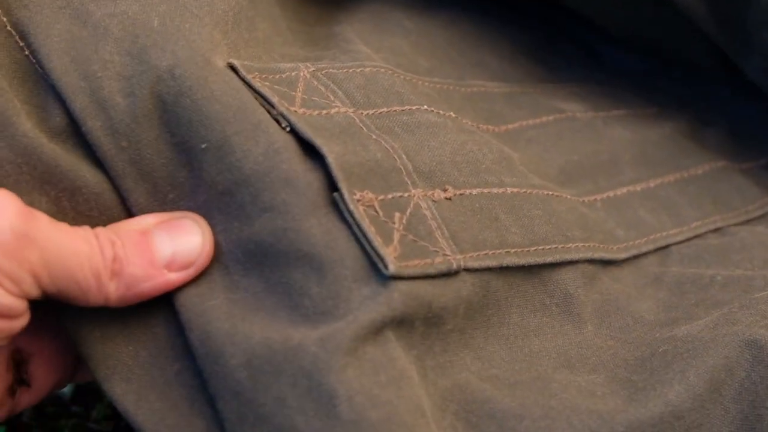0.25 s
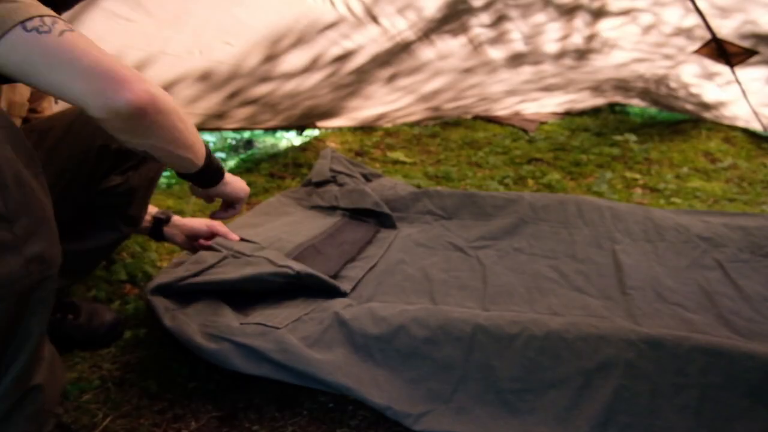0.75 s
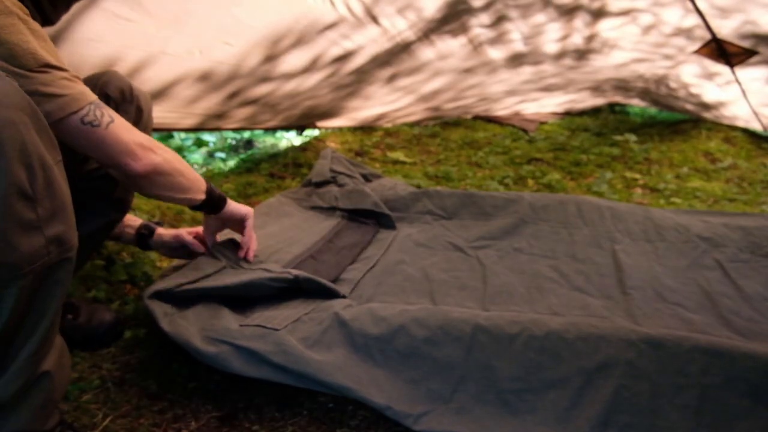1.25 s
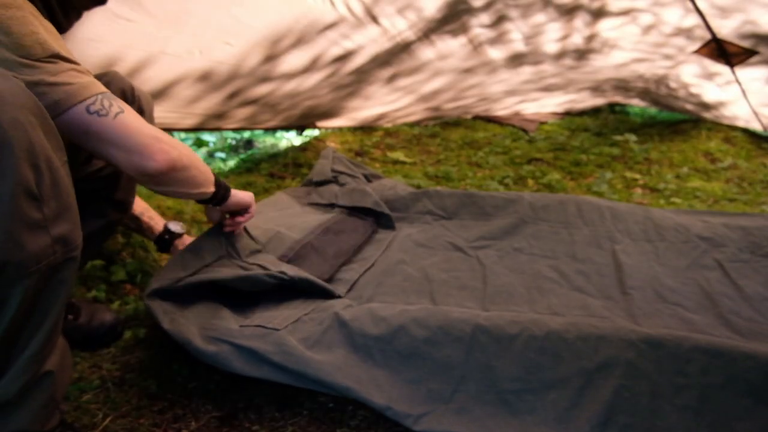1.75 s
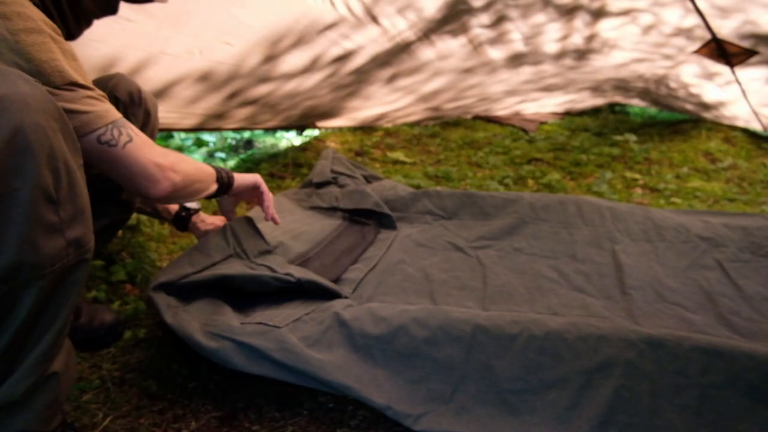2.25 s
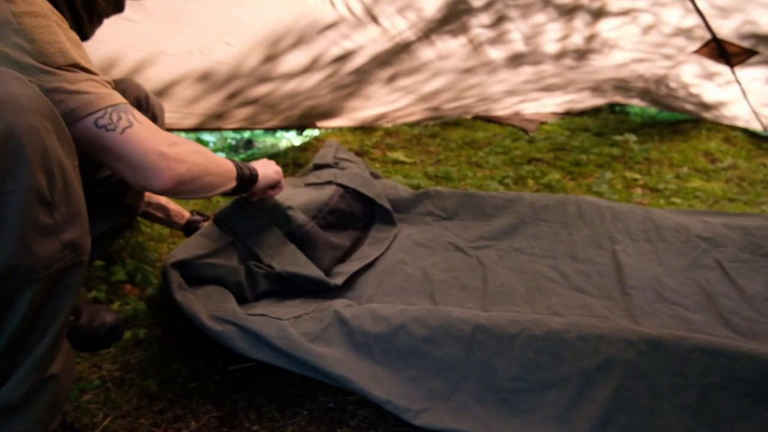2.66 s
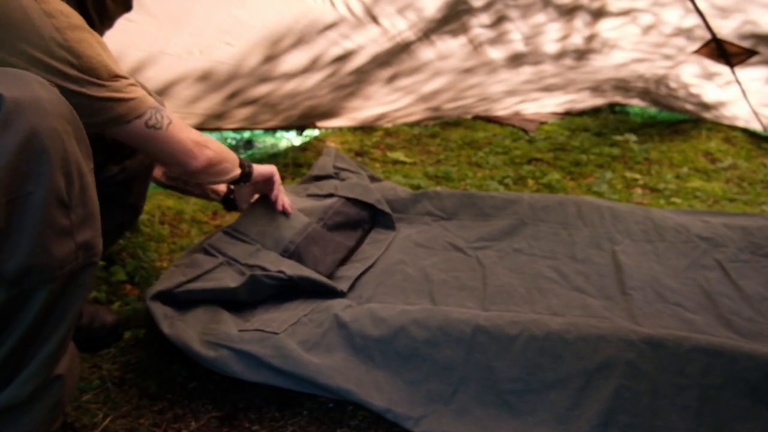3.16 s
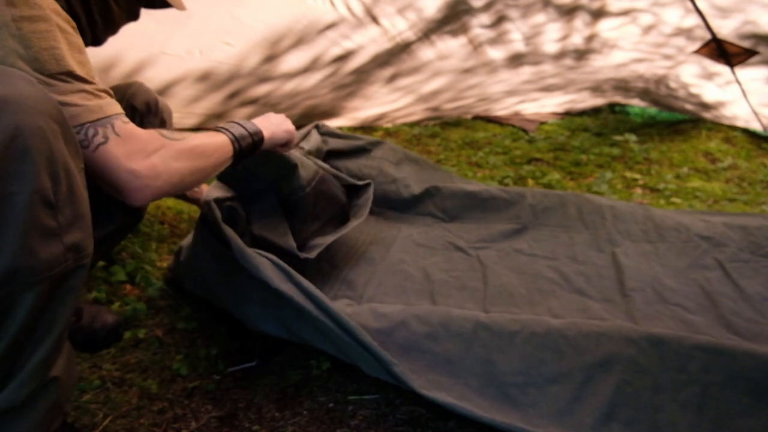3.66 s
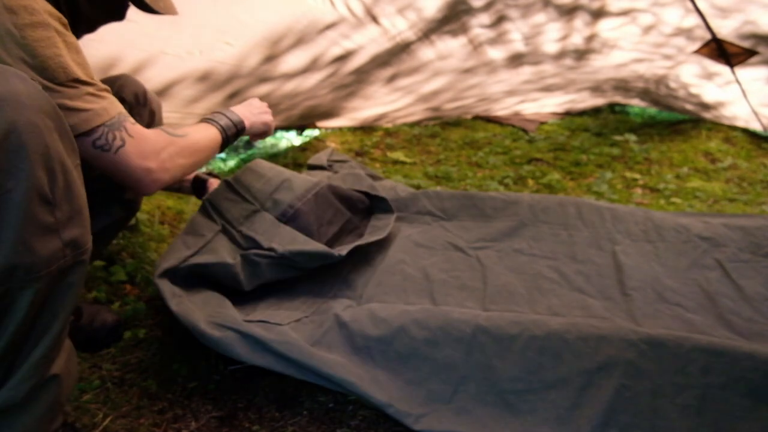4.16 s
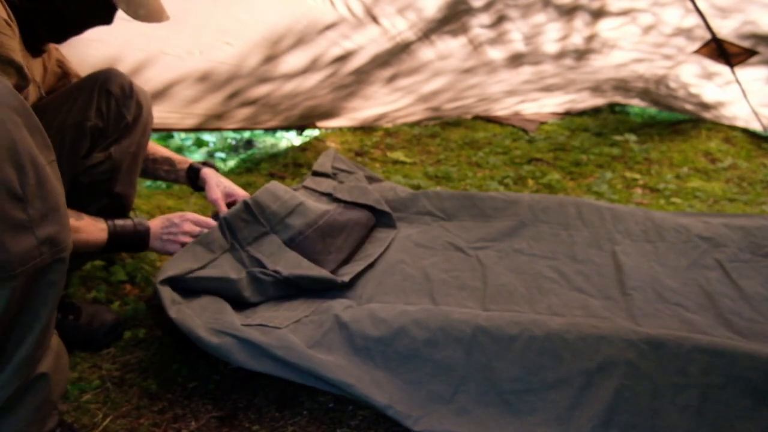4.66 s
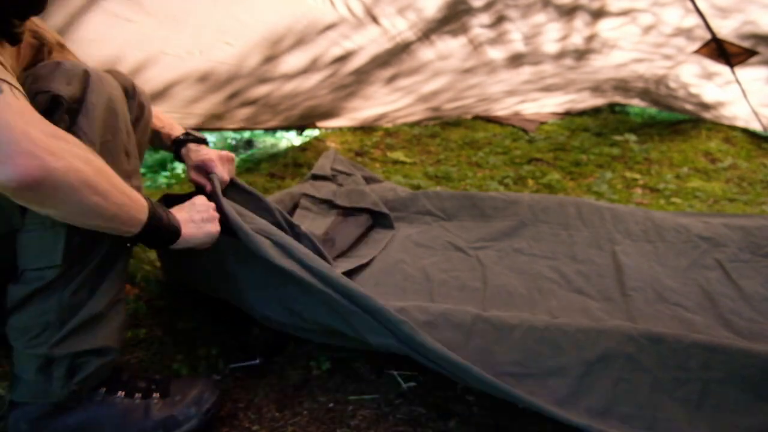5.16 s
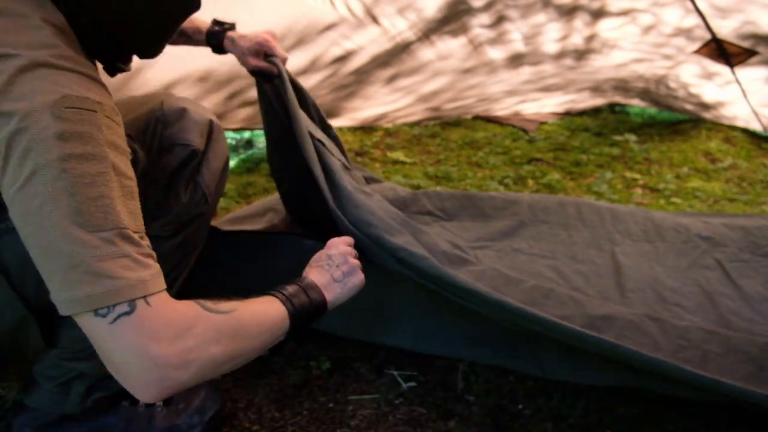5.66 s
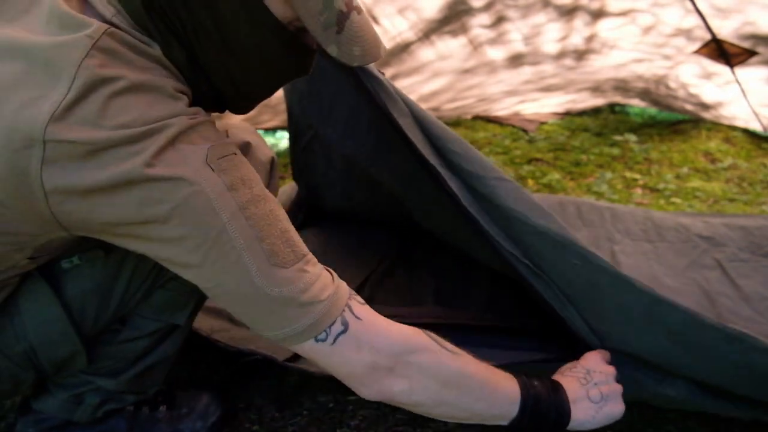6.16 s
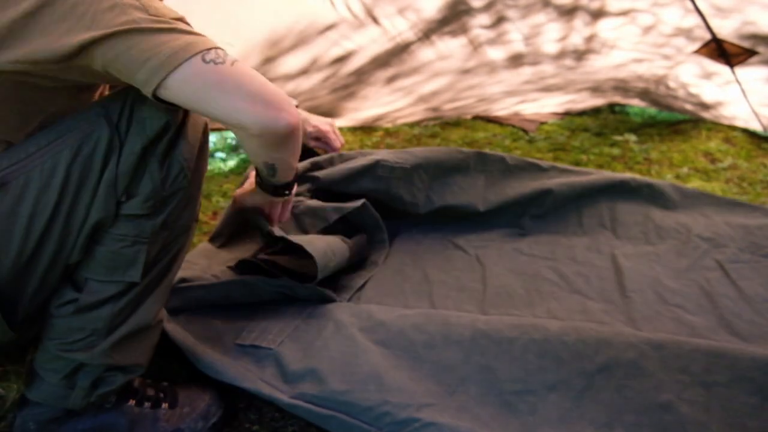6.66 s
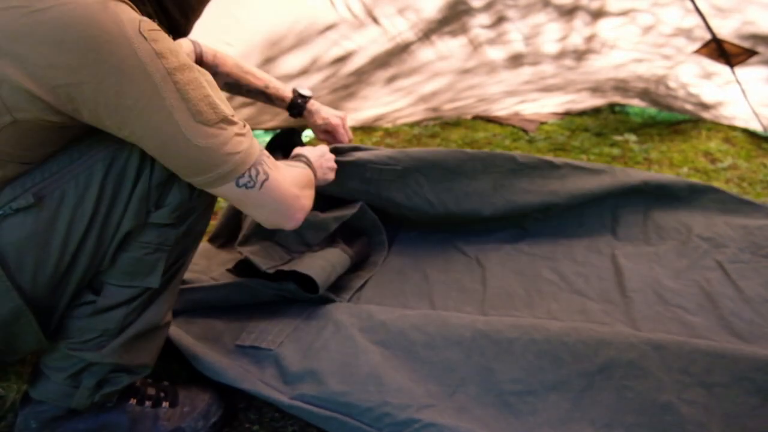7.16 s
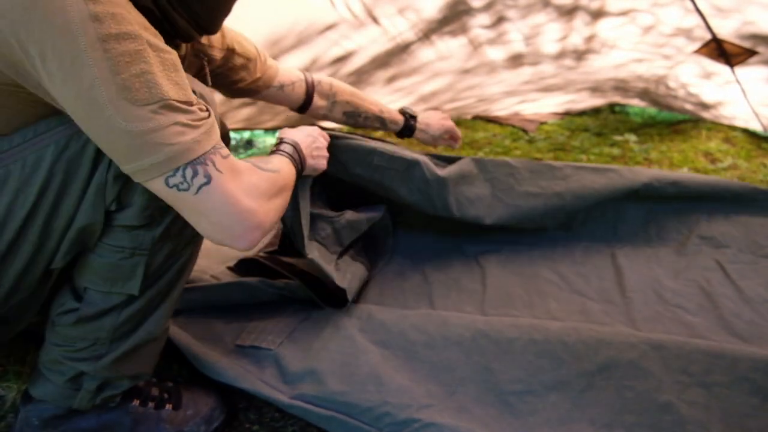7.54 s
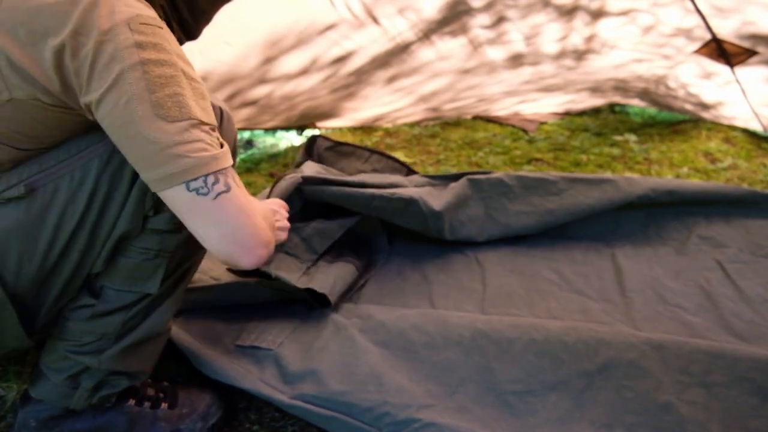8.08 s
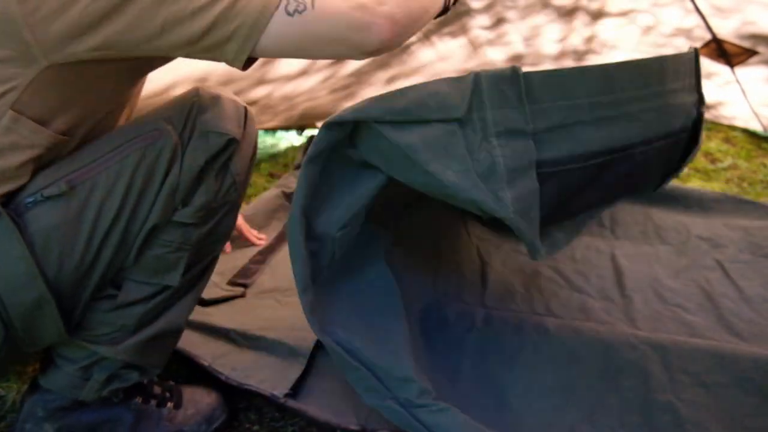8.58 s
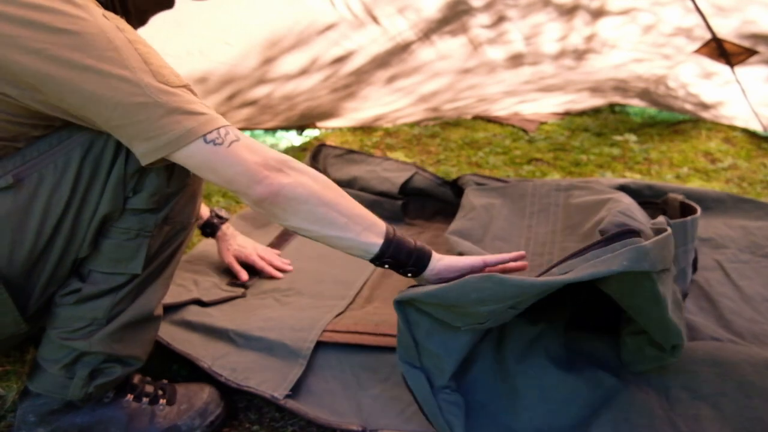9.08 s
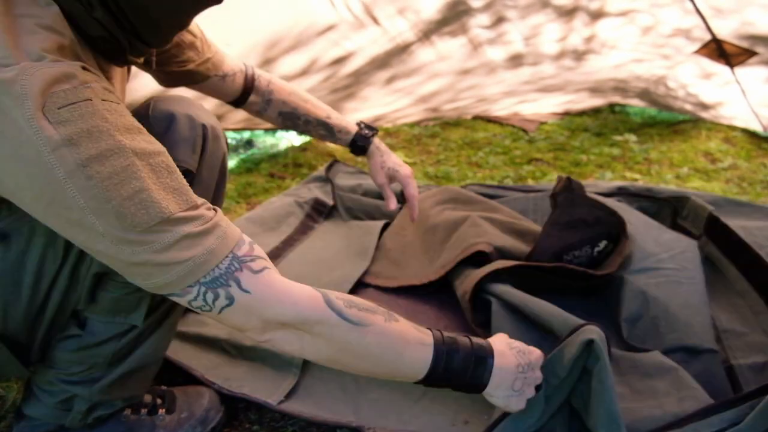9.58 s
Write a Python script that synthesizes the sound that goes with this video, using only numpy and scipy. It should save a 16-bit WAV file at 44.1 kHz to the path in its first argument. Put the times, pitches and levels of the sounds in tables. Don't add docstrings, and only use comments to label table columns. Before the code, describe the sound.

Close stereo pickup outdoors, with a low, soft hush of distant leaves and air and faint cloth rustle throughout. At 0.65-0.85 s a light cluster of dry pops as hook-and-loop tape begins to give. From 1.55 to 2.0 s a long bright crackling rip; 2.5-2.75 s a hard short one, with weak remnants to 2.95; 3.34-3.65 s a last rip, starting with sharp snaps. From 3.65 to 4.75 s a small metal zip pull clinks and jingles while canvas is gripped and rustles until 5.1. Zip strokes follow: quick rising-falling zings at 5.2 and 5.7, a slower, lumpier one at 6.3-6.6, a steady one at 7.2-7.5, with pull rattling and cloth shifting between. At 8.3-8.5 s the heavy flap is thrown open, loud, scratchy and airy, with a soft thump; pats at 8.75, then small rustles at 9.05 and 9.65 as it settles by 9.8.

```python
import sys
import numpy as np
from scipy import signal
from scipy.fft import rfft, irfft, next_fast_len
from scipy.io import wavfile
from scipy.ndimage import uniform_filter1d, map_coordinates

SR = 44100
rng = np.random.default_rng(int(sys.argv[2]) if len(sys.argv) > 2 else 0)


def volts(x):
    e = np.asarray(x, float) / 20
    return 10 ** e


def materialize(psi):
    bounded = np.clip(np.atleast_2d(psi).T, -1, 1)
    quanta = np.round(bounded * 32767).astype(np.int16)
    wavfile.write(sys.argv[1], SR, quanta)


N = 432621

# (frequency [Hz], level [dB])
HUSH_SPECTRUM = [(12, -46), (20, -20), (70, -3.5), (164, 0), (210, -3.5), (270, 2.5), (341, -3),
                 (415, -2.5), (614, 0), (1170, 1), (2050, -6), (4640, -9.5), (7900, -19.5), (12000, -36),
                 (15100, -50), (16400, -47)]
# (frequency [Hz], correlation [-1 to 1])
HUSH_ALIKE = [(60, .4), (250, .15), (1400, .55), (3000, .55), (5000, .6), (10000, .1), (12500, -.5)]
HUSH_DB = -36.5

# (frequency [Hz], lead [rad])
PORT_LEAD = [(0, -0.5), (3700, -0.26), (6500, 1.14), (9200, 1.51), (11700, 2.5), (14000, 4), (16200, 5)]
# (time [s], left minus right [dB])
HANDS_SIDE = [(0, 0.5), (8.2, -1.5), (8.7, -4.5), (9.81, -1.5)]
# (frequency [Hz], t60 [s])
TARP_DECAY = [(200, 0.05), (2000, 0.073), (10000, 0.036)]
# (frequency [Hz], level [dB])
TARP_COLOUR = [(100, -6.5), (1000, -4.5), (4000, 0.5), (9000, 4.5), (13000, 0), (16000, -19)]
# (frequency [Hz], level [dB])
BAND_EDGE = [(15700, 0), (15900, -38), (16300, -40), (16500, -100)]
# (time [s], length [s], lower edge [Hz], upper edge [Hz])
LOST_BANDS = [(.653, .014, 11700, 13900), (1.56, .012, 11000, 14000), (2.926, .012, 11200, 16500),
              (3.695, .035, 14900, 16500), (3.773, .05, 13200, 15000), (3.915, .018, 12000, 16500),
              (3.95, .035, 12950, 16500), (4.235, .012, 11200, 14000), (4.307, .048, 15000, 16500),
              (5.4, .028, 12250, 13400), (5.817, .07, 12500, 14000), (5.82, .045, 15000, 16500),
              (6.618, .024, 12000, 16500), (7.375, .025, 14800, 16500), (8.58, .024, 13600, 16500)]

# (time [s], rustle level [dB])
FIDGET = [(0, -49), (0.6, -46.5), (1.2, -46), (1.6, -46.5), (2.2, -52), (3.2, -45), (4.05, -48), (4.7, -46),
          (6.1, -47.5), (6.9, -45), (7.9, -44), (8.6, -43), (9.4, -45), (9.81, -48.5)]
# (time [s], swell length [s], rustle level [dB], flap level [dB])
STIRS = [(2.13, 0.06, -41.5, -56), (2.47, 0.37, -45.5, -60), (3.0, 0.082, -53, -48),
         (3.06, 0.058, -40.5, -52), (3.32, 0.033, -41, -56), (3.77, 0.11, -46, -44), (3.9, .015, -50, -45),
         (4.2, 0.035, -41, -36.5), (4.262, .025, -37, -35.5), (4.38, 0.047, -36.5, -42),
         (4.85, 0.01, -50, -33.5), (4.945, 0.033, -35.5, -47), (5.05, 0.09, -38.5, -45),
         (5.18, 0.086, -41, -38), (5.4, 0.049, -43, -40.5), (5.67, 0.11, -54, -44.5),
         (5.98, 0.059, -48, -42), (6.65, 0.11, -45.5, -41), (7.11, 0.052, -38.5, -38.5),
         (7.15, 0.038, -47, -44), (7.53, 0.093, -43, -42), (7.66, 0.092, -51, -39.5),
         (8.06, 0.023, -35, -54), (8.1, 0.05, -35, -54), (8.19, 0.027, -36, -37), (8.87, .06, -51, -54),
         (9.03, 0.057, -40, -38), (9.08, 0.023, -34.5, -31), (9.24, .1, -46, -60),
         (9.64, 0.028, -37.5, -35)]
# (time [s], swell length [s], rustle level [dB], flap level [dB])
FLINGS = [(8.29, 0.049, -39, -32.5), (8.323, 0.049, -27.5, -21), (8.365, 0.055, -27, -19),
          (8.41, 0.044, -31, -36), (8.452, 0.06, -25, -27.5), (8.478, 0.041, -21.5, -24.5),
          (8.535, 0.017, -30.5, -48), (8.72, 0.039, -37, -21), (8.745, 0.04, -29.5, -22),
          (8.775, 0.031, -30.5, -29.5), (8.8, 0.017, -41, -29)]
# (time [s], swell length [s], level [dB])
THUMPS = [
    (2.78, 0.13, -54),
    (3.584, 0.12, -41),
    (4.26, 0.033, -44),
    (5.36, 0.036, -46),
    (5.8, 0.031, -48),
    (5.94, 0.025, -44),
    (8.348, 0.14, -36.5),
    (8.744, 0.069, -40),
]
# (frequency [Hz], level [dB per Hz])
WEAVE_SPECTRUM = [(530, -28), (900, -7), (1760, -7), (2920, -4), (3640, -1.5), (8110, -5.5), (15200, -17),
                  (16400, -40)]
# (frequency [Hz], level [dB])
FLAP_SPECTRUM = [(100, -35), (170, -7.5), (297, -8), (439, -1.5), (559, -7.5), (757, -5), (870, -7.5),
                 (1560, -9.5), (3500, -26), (4550, -75), (7700, -120)]
# (frequency [Hz], level [dB])
GROUND_SPECTRUM = [(15, -50), (25, -22), (75, 0.5), (156, 0), (220, -4), (290, -5), (480, -120)]
STIR_RISE, FLING_RISE, THUMP_RISE = 1, 0.11, 0.34
SWELL_ROUND = 2.1
FIDGET_FLAP_DB = 1.5
WIDE_DB = -3

# (time [s], peak level [dB], low ring [dB], high ring [dB], tick above peak [dB])
JINGLES = [(2.2851, -29.5, -4, -12, 8.5), (3.6514, -19, -10, -8, -5), (3.7406, -17, -8, -3, -4),
           (3.7644, -26, -5, -12, -1), (3.7877, -24, -1, -6, 0), (3.8114, -27, -5, -10, 0),
           (3.9054, -18, -6, -18, -1), (3.935, -10, -9, -13, -11), (3.9468, -23, -11, -14, 5),
           (3.9844, -33, -3, -12, 2), (4.1539, -30, -1, -14, 2), (4.1858, -24, -6, -11, -3),
           (4.2188, -31, 8, -8, -3), (4.255, -19, -1, -12, 2), (4.283, -20, -12, -10, 11.5),
           (4.3155, -27.5, -1, -2, 5), (4.3624, -35, -3, -12, 2), (4.6672, -27, 0, -14, 7),
           (4.744, -34, -3, -12, 2), (6.5982, -28, 5, -14, 2), (6.6274, -19.5, 3, -20, 7),
           (6.7342, -21, 5.5, -15, 0), (7.0951, -29.5, 11, -13, 0), (7.5593, -29.5, 11, -17, 6),
           (7.632, -25.5, -3, -16, 13), (7.6816, -21, -4, -19, 4), (7.743, -26.5, -2, -14, 5),
           (8.514, -24, 9, -22, 2), (8.5873, -31, 3, -12, -2), (8.671, -21.5, -4, -16, 9)]
# (frequency [Hz], level [dB], t60 [s])
PULL_MODES = [(4000, -1, 0.075), (5750, 2, 0.036), (6230, -5, 0.045), (7800, -6, .04), (8890, -0.5, 0.075),
              (9060, -1, 0.058), (10600, -6.5, 0.045), (12500, 6, 0.07), (14600, 2, 0.077)]
# (time [s], peak level [dB])
RATTLES = [
    [(5.2293, -37), (5.2542, -18), (5.2891, -26), (5.3211, -25), (5.3694, -27)],
    [(5.7233, -42), (5.7892, -21), (5.8121, -25), (5.845, -17), (5.9069, -32), (5.9343, -26)],
    [(6.2873, -34), (6.3242, -26), (6.396, -38), (6.4569, -19.5), (6.5218, -31), (6.5741, -43)],
    [(7.1878, -30), (7.2307, -23), (7.2701, -20), (7.314, -14.5), (7.4068, -19), (7.4996, -40)],
]
# (added level [dB], low ring [dB], tick above peak [dB])
RATTLE_RING = (8.3, -12, 0)
RATTLE_HIGH_DB = [-5, -13, -16, -11]

# (time [s], tooth rate [1/s], tone level [dB], octave level [dB], scraping level [dB])
STROKES = [
    [(5.19, 253, -32, -46, -46), (5.208, 260, -26, -46, -44), (5.226, 485, -11, -36, -28),
     (5.236, 730, -37, -49, -18), (5.246, 910, -27, -17, -27), (5.292, 1160, -22, -39, -21.5),
     (5.308, 1090, -46, -34, -23.5), (5.33, 780, -26, -48, -24), (5.365, 650, -36, -43, -30.5)],
    [(5.69, 220, -54, -58, -39.5), (5.735, 374, -25, -29, -32), (5.782, 680, -23, -23, -26.5),
     (5.808, 1070, -17, -31, -21), (5.842, 1150, -18, -34, -25.5), (5.86, 900, -46, -44, -23.5),
     (5.896, 940, -27, -49, -27), (5.918, 770, -25, -26, -23), (5.965, 381.7, -33, -51, -53)],
    [(6.28, 246, -46, -45, -48), (6.325, 300, -34, -25, -30), (6.365, 430, -34, -23, -35.5),
     (6.395, 540, -27, -13, -29), (6.418, 620, -28, -33, -31.5), (6.468, 445, -29, -24, -26),
     (6.52, 530, -38, -31, -27), (6.56, 285, -34, -24, -30.5), (6.61, 240, -53, -41, -47)],
    [(7.175, 213, -38, -34, -32), (7.255, 530, -30, -37, -27), (7.285, 795, -27, -24, -24),
     (7.312, 650, -26, -21, -25.5), (7.352, 710, -29, -23, -25.5), (7.398, 543, -25, -35, -27.5),
     (7.432, 610, -27, -26, -31), (7.465, 400, -27, -42, -46), (7.51, 213, -29, -53, -49)],
]
# (frequency [Hz], level [dB])
SLIDER_SPECTRUM = [(1060, -23.5), (1800, 8), (2490, 6.5), (3990, 2.5), (5070, 2), (9080, -0.5),
                   (13100, -13), (14800, -20), (16000, -28), (16400, -50)]
# (frequency [Hz], level [dB])
TAPE_SPECTRUM = [(59, -46), (100, -11), (579, -9), (1160, -1), (1460, -8), (1960, -5), (3500, -14.5),
                 (4550, -30), (7700, -120)]
# (frequency [Hz], level [dB per Hz])
SIZZLE_SPECTRUM = [(8000, -42), (11000, -4), (13000, 3), (15500, -1), (16400, -40)]
# (frequency [Hz], width [Hz], level [dB])
SHAKEN_MODES = [(4030, 74, -1), (8500, 74, -10), (14500, 200, 8)]
SLOW_TEETH, SLOW_LUMPS_DB = 950, 4
SIZZLE_DB, SIZZLE_DB_PER_OCTAVE = -12, 18
BUZZ_DB_PER_OCTAVE = 5

# (time [s], peak level [dB], centre [Hz], cloth knock above peak [dB])
POPS = [(0.667, -24, 8400, -3), (0.6918, -20, 6230, 2.5), (0.707, -13, 6800, -5.5), (0.743, -17, 7040, -20),
        (0.752, -21, 6050, -6), (0.7754, -27, 7570, -16), (0.7871, -15.5, 7650, -3.5),
        (0.793, -8.5, 6000, -27), (0.824, -23, 6280, -17), (0.8424, -16, 5930, -11), (0.854, -21, 6380, -1),
        (1.5744, -6, 6100, -11), (1.596, -11.5, 6550, -6), (1.6367, -8.5, 5750, -18),
        (1.6453, -5, 6100, -8.5), (1.665, -9, 5800, -23), (1.675, -14, 6100, -26), (1.686, -9, 6200, -16),
        (1.7236, -11, 5000, -16), (1.774, -7.5, 8600, -9), (1.901, -13, 6390, -18), (2.51, -21, 6030, -22),
        (2.525, -20, 6000, -18), (2.544, -13, 6700, -18), (2.5607, -18, 4410, -17), (3.518, -7, 3000, -6),
        (3.575, -5, 4330, -27), (1.8175, -10, 7760, -7.5), (2.418, -22.5, 5240, -17),
        (2.4607, -20, 6100, -20), (2.7285, -16, 4900, -12), (2.8549, -26, 6700, -1),
        (2.9414, -23, 7900, -2), (2.9644, -25, 3480, 7), (3.201, -14.5, 3970, -31), (3.331, -30, 1800, -4),
        (3.344, -11, 3900, -29), (3.362, -1.5, 3000, -30), (3.352, -8, 4360, -32)]
# (time [s], peak level [dB], centre [Hz])
CREASES = [(2.8207, -21, 2870), (3.906, -20.5, 4000), (4.2549, -15, 1900), (4.2823, -21, 4380),
           (5.7882, -14, 4670), (5.8441, -29, 4050), (5.3681, -14, 4900), (5.942, -16, 6360),
           (8.3215, -25, 3330), (8.37, -18, 2540), (8.4487, -16.5, 8200), (8.718, -27, 5800),
           (8.755, -24, 5600), (8.7364, -16, 2980), (8.8367, -25, 3990), (9.0763, -20, 3050)]
CREASE_KNOCK_DB = 0.5

# (time [s], crackle level [dB], pitch of the freed strip [Hz], cloth drum above crackle [dB])
TEARS = [
    [(1.632, -38, 5920, -15), (1.64, -26, 6050, -13), (1.694, -21.5, 6500, -14.5),
     (1.724, -20.5, 5620, -15.5), (1.782, -16.5, 6110, -11), (1.81, -20.5, 5370, -15)],
    [(1.81, -22.5, 6040, -14), (1.854, -16.5, 6000, -9), (1.9, -19, 6500, -11), (1.99, -18.5, 5750, -16),
     (2.015, -50, 6060, -9)],
    [(2.495, -54, 6550, -13), (2.501, -38, 6510, -19), (2.509, -22.5, 6600, -14), (2.537, -30, 5600, -7),
     (2.563, -14, 5700, -9.5), (2.587, -16, 5750, -14.5), (2.661, -16, 5030, -17), (2.68, -29, 5080, -17)],
    [(2.68, -28, 5300, -11), (2.71, -18.5, 5420, -9.5), (2.72, -35, 5560, -5), (2.73, -21.5, 5730, -16),
     (2.76, -46, 5800, -7), (2.77, -41, 5650, -13)],
    [(2.78, -43, 5520, -13), (2.806, -31.5, 5440, -13), (2.832, -34.5, 5160, -3), (2.86, -27, 5610, -7.5),
     (2.882, -40, 5270, -15), (2.902, -24, 4940, -4), (2.925, -56, 5170, -13)],
    [(3.34, -43, 4130, -13), (3.344, -23, 4160, -3), (3.352, -16, 4220, -18), (3.424, -17, 5350, -13),
     (3.534, -17.5, 5100, -14), (3.57, -19.5, 4510, -14), (3.638, -24.5, 4800, -7.5), (3.68, -52, 6420, -9)],
]
# (frequency [Hz], level [dB per Hz])
HOOK_SPECTRUM = [(880, -36), (1500, -5), (2070, -16.5), (2680, -5), (5560, -5), (8060, -3.5), (12800, -6.5),
                 (15100, -12.5), (15900, -13), (16400, -59)]
# (frequency [Hz], level [dB])
DRUM_SPECTRUM = [(24, -38), (40, -22), (283, -2.5), (373, -18), (467, 3.5), (732, -4), (932, 6.5),
                 (1170, 1.5), (2500, -5.5), (3250, -31), (5500, -120)]
STRIP_HZ = [4100, 5000, 6100, 7400]
STRIP_Q, STRIP_DB = 2.97, 3


def unit(x):
    return x / np.sqrt(np.mean(x ** 2) + 1e-20)


def along(points, hz):
    f, v = np.transpose(points)
    return np.interp(np.log(hz + 1), np.log(f + 1), v)


def curves(tables, idle):
    out = np.tile(np.array(idle, float)[:, None], N)
    t = np.arange(N) / SR
    for rows in tables:
        s, *cols = np.transpose(rows)
        inside = (t >= s[0]) & (t <= s[-1])
        out[:, inside] = [np.interp(t[inside], s, c) for c in cols]
    return out


def gain(db):
    return uniform_filter1d(volts(db), size=200)


def swells(rows, rise):
    s, length, *levels = np.transpose(rows)[..., None]
    t = np.arange(0, N, 64) / SR
    loss_db = 10 * (np.maximum(t - s, (s - t) / rise) / length) ** SWELL_ROUND
    sums = [np.sqrt(np.sum(volts(db - loss_db) ** 2, axis=0)) for db in levels]
    return [np.interp(np.arange(N) / SR, t, total) for total in sums]


def wobble(rate):
    every = np.arange(0, N + 16, 16)
    knots = rng.standard_normal(int(N * rate / SR) + 4)
    return np.interp(np.arange(N), every, map_coordinates(knots, [every * rate / SR]))


def filtered(x, response):
    m = next_fast_len(N + 8192)
    return irfft(rfft(x, m) * response(np.fft.rfftfreq(m, 1 / SR)), m)[..., :N]


def coloured(x, spectrum):
    hz = np.fft.rfftfreq(4096, 1 / SR)
    cepstrum = irfft(np.log(volts(np.maximum(along(spectrum, hz), -80))))
    fold = np.r_[1, 2 * np.ones(2047), 1, np.zeros(2047)]
    return unit(signal.oaconvolve(x, irfft(np.exp(rfft(cepstrum * fold))))[:N])


def crackle(scatter_db, clump_db, clump_rate, patchy_db):
    size_db = scatter_db * rng.standard_normal(N) + clump_db * wobble(clump_rate)
    snaps = rng.standard_normal(N) * volts(size_db)
    z = signal.stft(snaps, nperseg=128)[2]
    field = uniform_filter1d(rng.standard_normal(z.shape), size=3, axis=0)
    field = uniform_filter1d(field, size=5, axis=1)
    return unit(signal.istft(z * volts(patchy_db * unit(field)), nperseg=128)[1][:N])


def hush():
    def turn(hz):
        return np.arccos(np.clip(along(HUSH_ALIKE, hz), -1, 1)) / 2

    def split(hz):
        return volts(along(HUSH_SPECTRUM, hz)) * [np.cos(turn(hz)), np.sin(turn(hz))]

    pair = [crackle(scatter_db=0, clump_db=.6, clump_rate=8, patchy_db=0.5) for _ in range(2)]
    mid, side = filtered(np.array(pair), split)
    level = volts(HUSH_DB - 1 + 0.42 * wobble(0.81))
    return volts([[-.4], [.4]]) * level * np.array([mid + side, mid - side]) / np.std(mid)


def tarp(x):
    hz, t, z = signal.stft(rng.standard_normal((32, 2, 3072)), SR, nperseg=128)
    tails = signal.istft(z * volts(-60 * t / along(TARP_DECAY, hz)[:, None]), SR, nperseg=128)[1]
    tails /= np.linalg.norm(tails[:, :1], axis=2, keepdims=True)
    out, step = np.zeros((2, N + SR)), 1024
    for i in range(0, N, step):
        echo = signal.fftconvolve(x[None, i:i + step], tails[rng.integers(len(tails))], axes=1)
        out[:, i:i + echo.shape[1]] += echo
    return filtered(out[:, :N], lambda hz: volts(along(TARP_COLOUR, hz)))


def canvas():
    resting = volts(curves([FIDGET], idle=[-120])[0])
    scratch, push = np.hypot(swells(STIRS, STIR_RISE), swells(FLINGS, FLING_RISE))
    rustle = coloured(crackle(scatter_db=2.5, clump_db=1.5, clump_rate=60, patchy_db=2), WEAVE_SPECTRUM)
    flap = coloured(crackle(scatter_db=5, clump_db=1.8, clump_rate=70, patchy_db=2), FLAP_SPECTRUM)
    thump = swells(THUMPS, THUMP_RISE)[0] * coloured(rng.standard_normal(N), GROUND_SPECTRUM)
    moved = np.hypot(scratch, volts(-1) * resting) * rustle
    moved = moved + np.hypot(push, volts(FIDGET_FLAP_DB) * resting) * flap
    wide = volts(WIDE_DB) * resting * np.array([np.roll(rustle, N // 3), np.roll(rustle, -N // 3)])
    return moved + thump, wide


def pull():
    out, t = np.zeros(N + SR), np.arange(SR // 8) / SR
    hz, level, t60 = np.transpose(PULL_MODES)[..., None]
    edge = signal.butter(2, [3500, 11500], "band", fs=SR)
    added_db, rattle_low_db, rattle_tick_db = RATTLE_RING
    swung = []
    for rows, high_db in zip(RATTLES, RATTLE_HIGH_DB):
        swung += [(s, db + added_db, rattle_low_db, high_db, rattle_tick_db) for s, db in rows]
    for s, db, low_db, high_db, tick_db in list(JINGLES) + swung:
        tilt = np.where(hz < 7000, low_db, np.where(hz > 11000, high_db, 0))
        strength, detune = np.clip(rng.standard_normal((2, len(PULL_MODES), 1)), -1.2, 1.2)
        modes = np.sin(2 * np.pi * hz * (1 + 0.004 * detune) * t)
        ring = volts(level + tilt + 4 * strength - 60 * t / t60) * modes
        scratch = signal.lfilter(*edge, rng.standard_normal(len(t) + 1))[1:]
        tick = volts(tick_db + 3 - 60 * t / 0.041) * scratch
        onset = 1 - np.exp(-t / 0.00073)
        out[round(s * SR):][:len(t)] += volts(db - 12.5) * (ring.sum(axis=0) + tick) * onset
    return out[:N]


def zip_fastener():
    rate, tone_db, octave_db, rasp_db = curves(STROKES, idle=[300, -120, -120, -120])
    slow = np.clip(2 - 2 * rate / SLOW_TEETH, 0, 1)
    jitter = (.008 + .03 * slow) * wobble(70) + (.015 + .04 * slow) * wobble(300)
    teeth = np.cumsum(rate * (1 + jitter)) / SR
    lumps_db = 1.5 + SLOW_LUMPS_DB * slow

    def partial(k, db):
        lumpy_db = lumps_db * np.clip(wobble(60), -2, .2) - lumps_db / 3
        flutter_db = 1.5 * np.clip(wobble(200), -3, 1)
        breaks = 1 - .45 * slow + .6 * slow * np.clip(wobble(110), -2, .6)
        return volts(db + lumpy_db + flutter_db) * breaks * np.sin(2 * np.pi * k * teeth)

    def shaken(f):
        return 1 + sum(volts(db) * 1j * f * w / (c * c - f * f + 1j * f * w) for c, w, db in SHAKEN_MODES)

    grains = crackle(scatter_db=2.5, clump_db=0.8, clump_rate=60, patchy_db=2.5)
    scrape = np.exp(-3 * (teeth % 1)) * grains
    rasp = unit(filtered(coloured(scrape, SLIDER_SPECTRUM), shaken))
    song = gain(tone_db) * partial(1, 3) + gain(octave_db) * partial(2, 3)
    octaves = np.log2(rate / 1000)
    overtones = partial(3, -3) + partial(4, -6) + partial(5, -10) + partial(6, -13)
    buzz = volts(BUZZ_DB_PER_OCTAVE * octaves) * overtones
    sizzle = volts(SIZZLE_DB + SIZZLE_DB_PER_OCTAVE * octaves) * coloured(scrape, SIZZLE_SPECTRUM)
    tape = volts(-3.5) * coloured(scrape, TAPE_SPECTRUM)
    return song + gain(rasp_db) * (rasp + sizzle + buzz + tape)


def pops():
    bright, dull, t = np.zeros(N + SR), np.zeros(N + SR), np.arange(SR // 8) / SR
    spray_band = signal.butter(2, [2500, 11000], "band", fs=SR)
    knock_band = signal.butter(2, [300, 1700], "band", fs=SR)
    for s, db, hz, knock_db in list(POPS) + [(*row, CREASE_KNOCK_DB) for row in CREASES]:
        burst = rng.standard_normal(len(t)) * volts(3.2 * rng.standard_normal(len(t)))
        burst = unit(burst) * volts(db - 60 * t / 0.027) * (1 - np.exp(-t / 0.0018))
        peak = signal.iirpeak(hz, 1.8, SR)
        pitched = signal.lfilter(*peak, signal.lfilter(*peak, burst))
        spray = volts(-9) * signal.lfilter(*spray_band, burst)
        start = round(s * SR)
        bright[start:][:len(t)] += volts(7) * (pitched + spray)
        dull[start:][:len(t)] += volts(knock_db + 10.0) * burst
    return bright[:N] + signal.lfilter(*knock_band, dull[:N])


def strips():
    crackle_db, pitch_hz, drum_db = curves(TEARS, idle=[-120, 5000, 0])
    snaps = crackle(scatter_db=5.2, clump_db=1.3, clump_rate=220, patchy_db=2)
    hooks = coloured(snaps, HOOK_SPECTRUM)
    place = np.interp(pitch_hz, STRIP_HZ, np.arange(len(STRIP_HZ)))
    ring = np.zeros(N)
    for k, hz in enumerate(STRIP_HZ):
        share = np.sqrt(np.clip(1 - np.abs(place - k), 0, 1))
        ring += share * signal.lfilter(*signal.iirpeak(hz, STRIP_Q, SR), hooks)
    drum = gain(crackle_db + drum_db) * coloured(snaps, DRUM_SPECTRUM)
    return gain(crackle_db - 4) * (hooks + volts(STRIP_DB) * ring) + drum


def scene():
    cloth, wide = canvas()
    dry_near = cloth + pull() + zip_fastener() + pops() + strips()
    panning = volts(np.outer([.5, -.5], curves([HANDS_SIDE], idle=[0])[0]))
    near = volts(0.5) * dry_near * panning + volts(-5.5) * tarp(dry_near)
    memory = .06 * SR
    loudness = signal.lfilter([1 / memory], [1, 1 / memory - 1], np.abs(near).mean(axis=0))
    both = near + wide + hush() / (1 + loudness / volts(-15.5))
    return filtered(both, lambda hz: np.exp(.5j * np.outer([1, -1], along(PORT_LEAD, hz))))


def without_lost_bands(x):
    out = x.copy()
    for s, length, low_hz, high_hz in LOST_BANDS:
        span = slice(round(s * SR) - 128, round((s + length) * SR) + 128)
        n = span.stop - span.start
        hz, fade = np.fft.rfftfreq(n, 1 / SR), signal.windows.tukey(n, 256 / n)
        band = (hz > low_hz) & (hz < high_hz)
        out[:, span] -= fade * irfft(rfft(out[:, span]) * band, n)
    return out


def low_pass(x):
    return signal.sosfilt(signal.butter(12, 16650, fs=SR, output="sos"), x)


def record(dry):
    held = dry / (1 + np.abs(dry / .95) ** 4) ** (1 / 4)
    held = filtered(held, lambda hz: volts(along(BAND_EDGE, hz)))
    return low_pass(without_lost_bands(held))


dry = scene()
out = record(dry)
materialize(out)
```